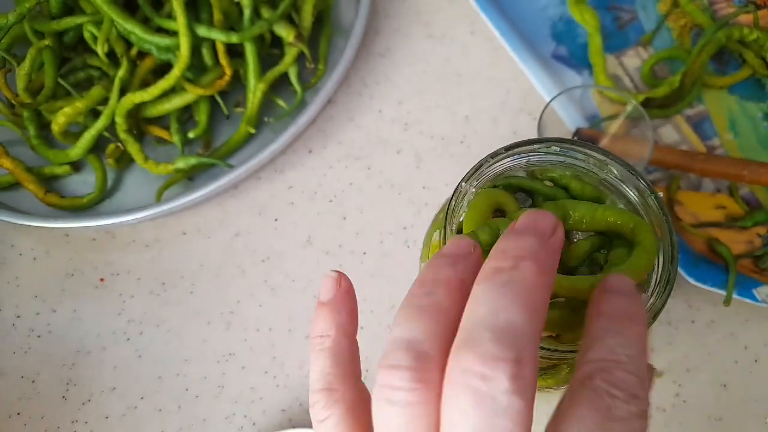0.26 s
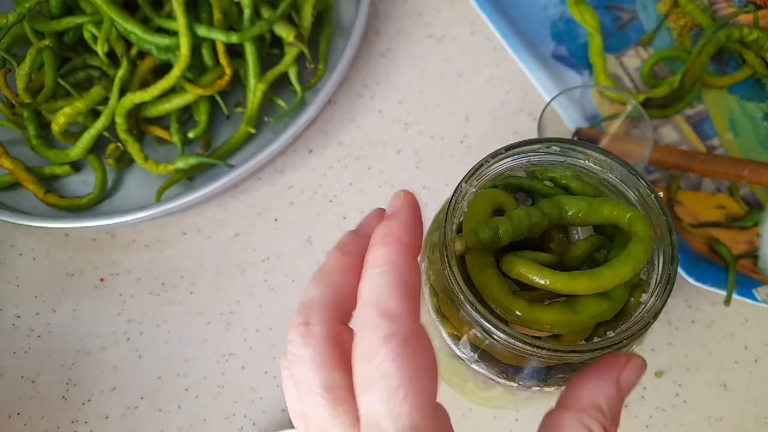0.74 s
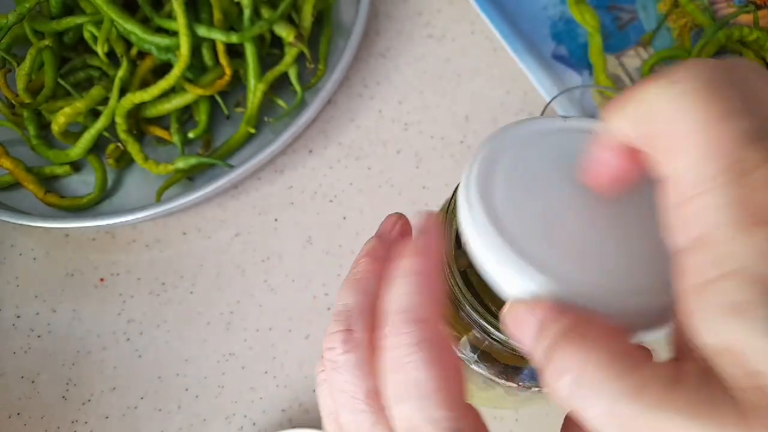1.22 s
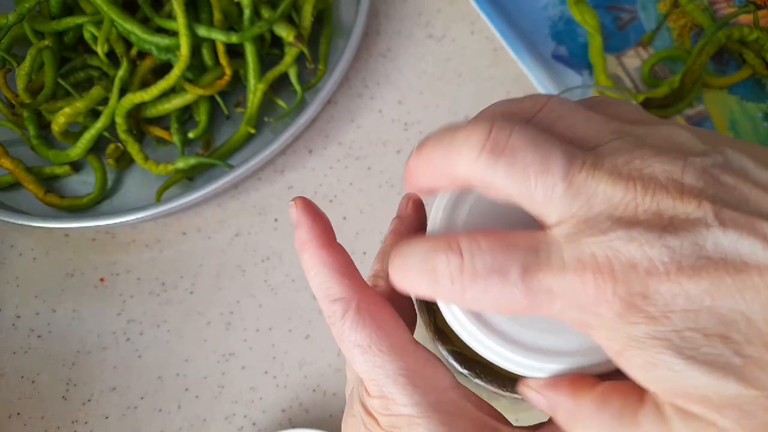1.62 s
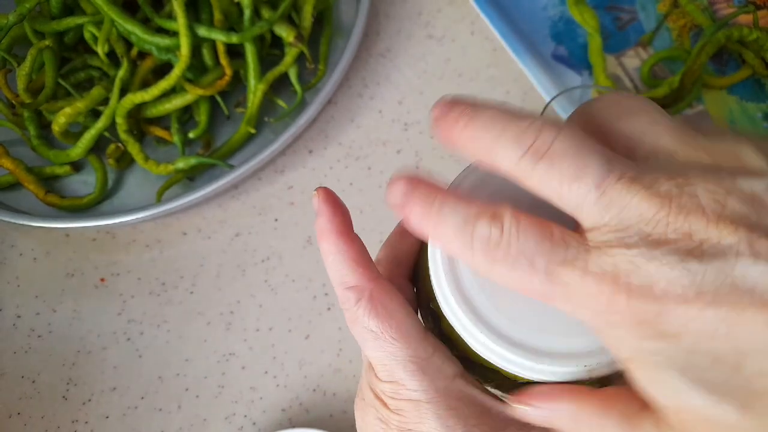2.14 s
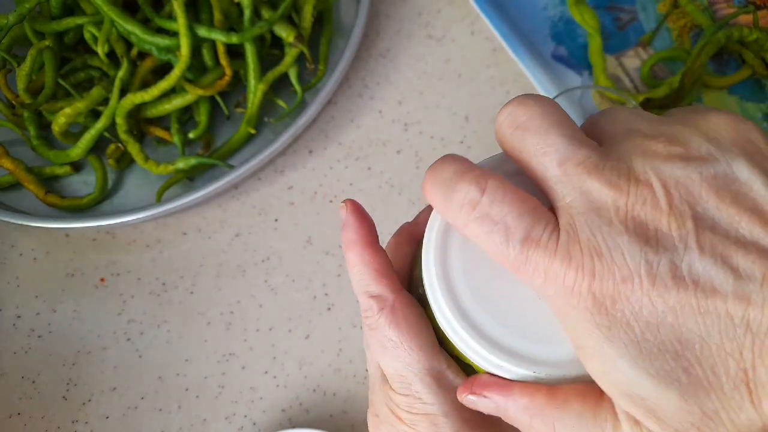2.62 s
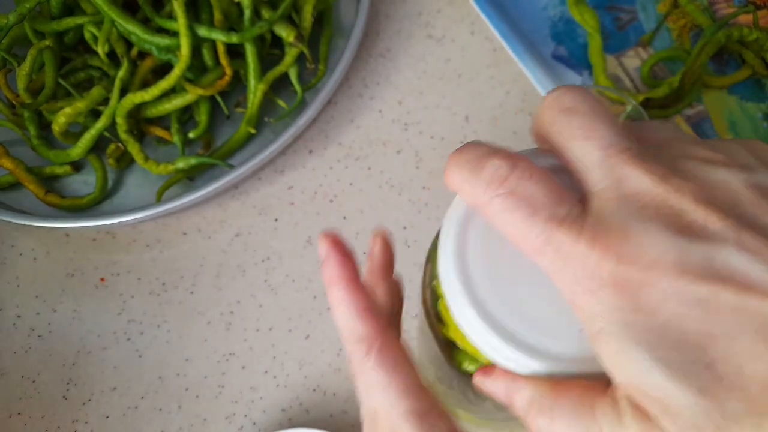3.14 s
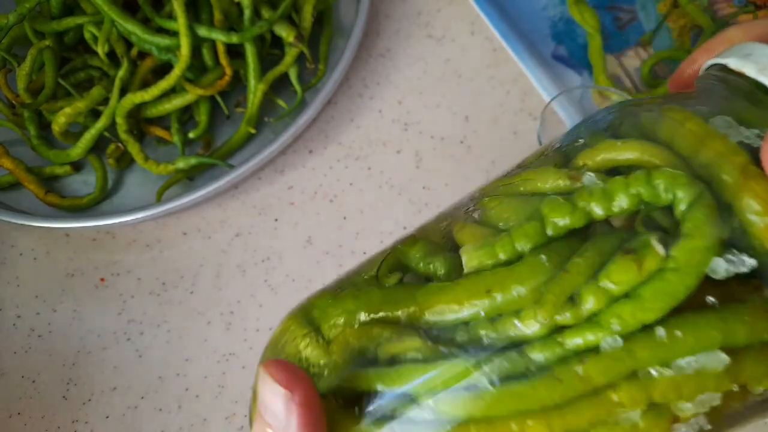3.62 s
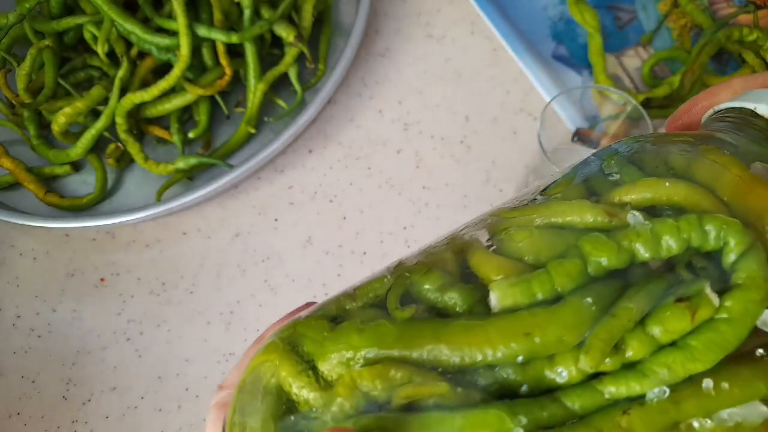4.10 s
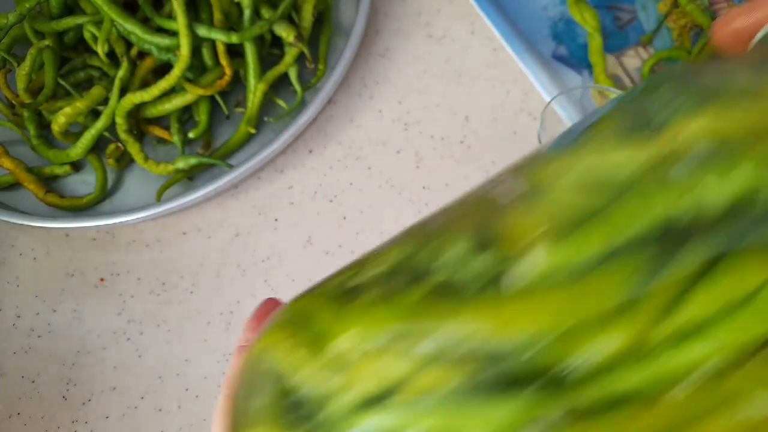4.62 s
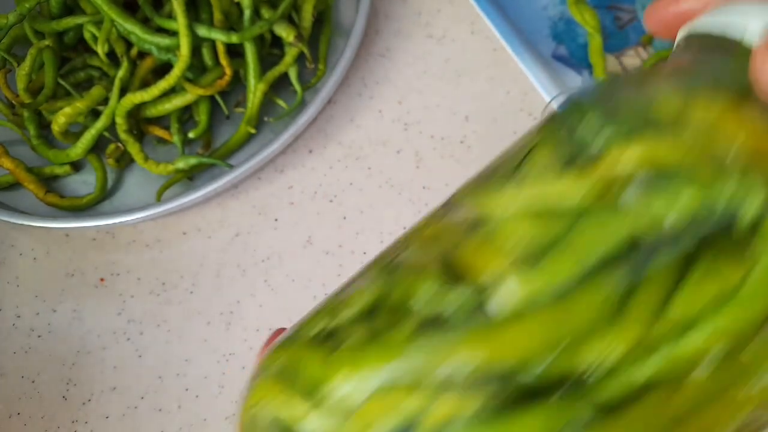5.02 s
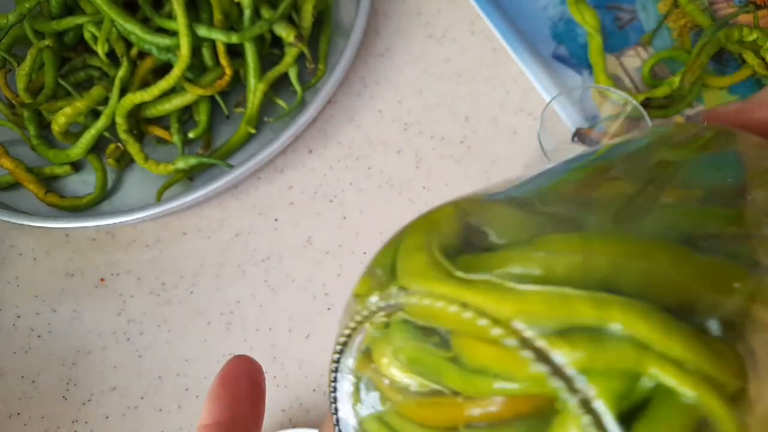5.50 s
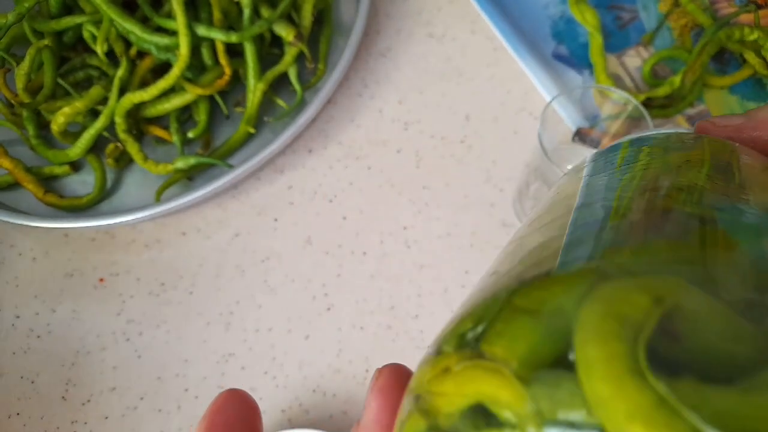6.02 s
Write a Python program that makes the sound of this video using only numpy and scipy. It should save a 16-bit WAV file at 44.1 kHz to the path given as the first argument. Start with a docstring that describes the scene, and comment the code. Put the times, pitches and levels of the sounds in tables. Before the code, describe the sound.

Close kitchen sounds: a lid rattles sharply onto a jar, muffled clicks and thread scrapes tighten it, then quiet skin rubs and tiny wet clicks follow.

```python
"""On a kitchen counter a metal screw lid is set on a full glass jar, rattles onto the thread and is twisted shut.
Knocks ring the lid's modes; turns scrape the thread and push the counter. The jar is then tipped in wet hands:
bands of noise rub on the glass and short clicks tick. A fridge hums as blurred tones over a low rumble,
a faint narrow hiss and room air."""
import sys
import numpy as np
from scipy import signal
from scipy.fft import rfft, irfft
from scipy.io import wavfile
from scipy.ndimage import uniform_filter1d

SR = 44100
rng = np.random.default_rng(int(sys.argv[2]) if len(sys.argv) > 2 else 0)


def store_wav(level_fs):
    """Save 16-bit WAV to argv[1]."""
    pcm = np.round(np.clip(np.atleast_2d(level_fs), -1, 1) * 32767)
    wavfile.write(sys.argv[1], SR, pcm.T.astype(np.int16))


N = 276066  # length in samples

# lid against rim: start_s, peak_db, treble_over_ring_db, counter_thud_db, favoured_pitch_hz
LID_KNOCKS = [(1.185, -14.5, -22, -25.5, 1900), (1.296, -29.5, -0.5, -45, 2610),
              (1.324, -14, -13, -26, 1360), (1.344, -24, -13, -58, 1880), (1.373, -17, -7, -15, 1280),
              (1.48, -27.5, -12, -38, 1490), (1.5, -27, -19, -46, 1290), (1.76, -48, -10, -41, 1310),
              (1.805, -46, -24, -30.5, 2450), (1.819, -40, -29, -46, 2420), (1.884, -27, -19.5, -48, 1260),
              (1.896, -23, -12, -24.5, 1660), (1.941, -27, -2, -44, 2950), (1.961, -29, -2, -23, 2940),
              (2.034, -50, 5, -60, 3620), (2.045, -46, 5.5, -52, 3440), (2.201, -48.5, 5, -37, 1840),
              (2.243, -53, -1.5, -33.5, 1330), (2.308, -36.5, -12.5, -48, 1250),
              (2.337, -42, -8, -35.5, 3620), (2.409, -45, -25, -37, 3470), (2.554, -58.5, -1, -63, 3460),
              (2.721, -41, -7.5, -44, 2220), (2.758, -49, -12, -44, 2230), (2.779, -49.5, -12, -34.5, 2070),
              (2.883, -38.5, -6.5, -35, 3270), (2.918, -38.5, -7.5, -63, 3660), (2.97, -40, -3, -43, 3660),
              (3.007, -47.5, -2, -40, 3480)]
# ringing modes of the lid: pitch_hz, level_db, t60_s (before damping)
LID_MODES = [(1000, -5, .05), (1190, -9, .04), (1355, -.4, .07), (1630, -10, .05), (1880, -9, .06),
             (2150, -10, .04), (2525, -4, .05), (2620, -4, .075), (2950, -10, .04), (3380, -2, .07),
             (3600, -8, .06), (4290, -13, .05), (5300, -14, .04), (6300, -22, .03), (7500, -22, .03)]
# ringing modes of the counter: pitch_hz, level_db, t60_s (before damping)
COUNTER_MODES = [(216, -13, 0.015), (247.5, 5.5, 0.056), (293, -0.5, 0.06), (366, -1.5, 0.057),
                 (485, -16.5, 0.081)]
# turns of the wrist: start_s, length_s, thread_scrape_db, counter_push_db, deepest_counter_mode_db
WRIST_TURNS = [(1.165, 0.11, -56, -47.5, -79), (1.289, 0.13, -53.5, -35, -52),
               (1.438, 0.11, -54, -36, -32.5), (1.587, 0.14, -69.5, -53, -45.5),
               (1.762, 0.081, -56.5, -42, -67), (1.832, 0.13, -45, -36.5, -40.5),
               (2.022, 0.053, -72, -49.5, -54.5), (2.272, 0.11, -62.5, -52, -59),
               (2.369, 0.099, -63.5, -45.5, -52.5), (2.511, 0.19, -73.5, -55.5, -71),
               (2.687, 0.12, -71, -49, -50.5), (2.856, 0.2, -66, -54, -56), (3.09, 0.13, -69, -53.5, -66)]
# fingers sliding on lid and glass: start_s, length_s, lower_band_db, upper_over_lower_db
SKIN_RUBS = [(0.355, 0.24, -76, 3.5), (0.565, 0.16, -85, 7.5), (0.717, 0.094, -81, 6),
             (0.843, 0.09, -86.5, 14.5), (3.066, 0.24, -74.5, -16), (3.468, 0.13, -82.5, 1.5),
             (3.559, 0.15, -72, -6), (3.721, 0.088, -66, -2.5), (3.81, 0.065, -79, -2.5),
             (3.886, 0.15, -60.5, -4), (4.132, 0.031, -85, 10), (4.454, 2.03, -88.5, 4.5),
             (4.631, 0.092, -75.5, 1), (4.752, 0.1, -67.5, 0.5), (4.835, 0.15, -77.5, 5),
             (5.048, 0.11, -66, -1), (5.141, 0.14, -66, 1), (5.39, .25, -79.5, 17), (5.756, 0.14, -73, -1),
             (6.057, 0.25, -86, 3.5)]
# wet skin letting go of the glass: start_s, lower_band_peak_db, centre_hz
SKIN_TICKS = [(3.562, -57.5, 3270), (3.575, -53.5, 4910), (3.7361, -46, 4330), (3.7738, -44.5, 2720),
              (3.8367, -57.5, 4340), (3.902, -54.5, 7860), (3.914, -48.5, 8000), (3.932, -58, 6500),
              (3.9507, -44, 5500), (4.128, -56.5, 7000), (4.6435, -59.5, 3560), (4.7474, -57, 6930),
              (4.8792, -49, 5260), (5.0668, -51, 8000), (5.104, -49, 6400), (5.1598, -48.5, 5800),
              (5.463, -49, 10000), (5.5072, -46.5, 5650), (5.5613, -51.5, 7750), (5.7159, -56, 7500),
              (5.7548, -54, 5430), (5.8237, -45.5, 6000)]
# jar nudged on the counter: start_s, peak_db, pitch_hz, t60_s, rattle_peak_db
JAR_BUMPS = [(0.592, -40, 117, 0.15, -81), (3.926, -46, 192, 0.079, -49),
             (3.938, -25.5, 526, 0.0075, -41.5), (3.952, -37, 477, 0.061, -40),
             (3.978, -44, 640, 0.019, -33.5), (3.987, -39.5, 184, 0.015, -45)]
# a faint glass clink: pitch_hz, level_db, t60_s (before damping)
CLINK_MODES = [(2640, -6.5, 0.055), (4670, -6, 0.21), (12200, -1, 0.15)]
# fridge tones: pitch_hz, level_db, blur_width_hz (of each filter pass)
FRIDGE_TONES = [(140.7, -71.5, 9), (184.8, -64, 6.9), (199.3, -63, 3), (240.4, -68.5, 9),
                (325.6, -71.5, 14), (376.6, -62.5, 1.7), (423.3, -67, 3.8), (532, -83.5, 8.6),
                (969, -75, 3.4), (1065, -85.5, 3.6)]
# a low rumble, strongest at first: time_s, level_db
RUMBLE_LEVEL = [(0, -64.5), (.95, -68), (1.099, -83), (3.099, -75.5), (6.26, -82)]
# tilt of the room air, before its overall level is set: pitch_hz, relative_db
AIR_SPECTRUM = [(15, -52), (25, -21), (92, -20.5), (180, 1.5), (285, -10.5), (373, -3), (591, -21.5),
                (863, -21), (962, -24), (1190, -34.5), (6740, -41.5), (7310, -50.5), (9570, -37.5),
                (14800, -39), (16000, -56)]
# how alike the air is at both ports: pitch_hz, likeness (0 to 1)
AIR_LIKENESS = [(60, 0.17), (180, 0.56), (550, 0.8), (1650, 0.21), (4970, 0.015), (15000, 0.079)]
# stereo balance of the background: pitch_hz, left_over_right_db
AIR_BALANCE = [(60, -3.5), (380, -2.5), (2380, -6.5), (15000, 2)]
# stereo balance of the jar: pitch_hz, left_over_right_db
JAR_BALANCE = [(60, -1), (240, -1), (950, -5), (3770, -0.5), (15000, 1.5)]

# Lid contacts
SEATED_S = 1.45  # from here on the lid sits on the thread
CLEAN_BLOW = 4.  # single impulse put ahead of the chatter of a free lid
NARROW_FREE_DB, NARROW_SEATED_DB = 2.5, 22  # fall per octave away from the favoured pitch
SCATTER_DB = 2.5  # every contact lands elsewhere and spreads the mode levels
DETUNE_FREE, DETUNE_SEATED = .004, .04  # pressure bends the modes, as a share of their pitch

# Twisting
TURN_RISE_S = 0.035
TURN_FADE_S = (0.02, 0.029, .06)  # decay constants of scrape, push and deepest mode
SCRAPE_GRIP = 8.  # damping of the turning lid
SCRAPE_HZ, TIGHTEN_S = (1900, 3300), (2.0, 2.4)  # favoured pitch loose and tight; when the thread tightens
DEEP_MODE, DEEP_PURITY = (123.5, 13), 1.5  # (Hz, width Hz); sine peak against noise rms
SHUDDER_BAND, SHUDDER_DB = (62.5, 30), -20  # cabinet under the counter (Hz, width Hz); level against the push

# Hands and glass
LID_ON_S, TIPPED_S = 1.18, 4.05  # the lid meets the jar; the jar lies tipped in the hands
ON_LOOSE_LID, ON_SHUT_LID, ON_GLASS = (3390, 330), (3900, 5100), (5270, 3100)  # lower skin band (Hz, width Hz)
SKIN_BAND, SKIN_AIR = (10200, 4200), .55  # upper skin band (Hz, width Hz); gain of the fizz above it
TICK_TREBLE_DB = 1
STRAY_PER_S, STRAY_SPAN_S = 16, (5.3, 6.25)  # faint ticks at random while the jar is turned
STRAY_DB, STRAY_HZ = -68, (4000, 8000)  # faintest stray tick; range of centres
CLINK_S, CLINK_DB = .152, -62

# Background
HUM_PURITY = 2.2  # sine peak against noise rms
WHINE_SPAN_S, WHINE_BAND, WHINE_DB = (4.55, 5.95), (1470, 260), -84  # band: (Hz, width Hz)
AIR_DB, AIR_PATCHY_DB = -58.5, 1.6  # overall level; rms unevenness over time and pitch

# Space
AIR_LEAD_S, JAR_LEAD_S, HAND_LEAD_S = -0.00011, .00006, .00003  # left port ahead of the right
JAR_LOW_HZ = 105  # jar sounds fall away below this
ROOM_DB = -12
GLINT_DB, GLINT_HZ, GLINT_T60_S = -2.5, 4500, .02  # glass and hands scatter the treble
GLINT_CYCLES_PER_S = 3.7  # pace at which the echo patterns take turns
TOP_HZ = 15700


def knocks():
    """Each contact is a short chatter: it rings the lid, cracks in the treble and thuds through the jar."""
    out = np.zeros(N)
    t = np.arange(1500) / SR
    thud = np.convolve(ring(COUNTER_MODES, 2.1), np.hanning(130))  # the heavy jar takes the blow softly
    for s, db, crack_db, thud_db, hz in LID_KNOCKS:
        # a free lid is struck cleanly and a weak part of it sings on; on the thread it chatters and is dull
        free = s < SEATED_S
        chatter_s, sing_db, grip = (.0006, -17, 2.8) if free else (.0015, -36, 6.)
        narrow_db = NARROW_FREE_DB if free else NARROW_SEATED_DB  # a clean blow reaches more modes
        u = t / chatter_s
        chatter = rng.standard_normal(1500) * u * np.exp(-u)
        chatter[0] += CLEAN_BLOW * free

        bend, share = rng.standard_normal((2, len(LID_MODES)))
        bend = 1 + (DETUNE_FREE if free else DETUNE_SEATED) * bend
        modes = [(f * b, level + SCATTER_DB * c, t60)
                 for (f, level, t60), b, c in zip(LID_MODES, bend, share)]
        gripped = ring(modes, grip, hz, narrow_db)
        singing = ring(modes, 0.38, hz, narrow_db)
        lid = gripped + gain_of(sing_db) * singing
        lid = treble(signal.fftconvolve(lid, chatter), 720)

        crack_shape = (1 - np.exp(-t / 0.0009)) * (np.exp(-t / 0.0004) + 0.11 * np.exp(-t / 0.0072))
        crack = sizzle(rng.standard_normal(1500) * crack_shape)
        add(out, s, gain_of(db) * peaked(lid))
        add(out, s, gain_of(db + crack_db) * peaked(crack))
        add(out, s + .003, gain_of(thud_db) * peaked(thud))
    return out


def twist():
    """Slips of the thread ring the gripped lid; the turning force shakes the counter."""
    scrape_gain, push_gain, deep_gain = map(effort, np.transpose(WRIST_TURNS)[2:], TURN_FADE_S)
    slips = grit(2500, 3.2)
    loose, tight = (scraped_lid(slips, hz) for hz in SCRAPE_HZ)
    tightness = np.interp(np.arange(N) / SR, TIGHTEN_S, (0, 1))
    scrape = (1 - tightness) * loose + tightness * tight
    hiss = evened(sizzle(slips + 1.5 * rng.standard_normal(N)))

    shove = rng.standard_normal(N) + .7 * grit(150, 2.5)
    push = evened(signal.oaconvolve(shove, ring(COUNTER_MODES))[:N])
    deep = evened(band(shove, *DEEP_MODE))
    tone = np.sin(2 * np.pi * DEEP_MODE[0] * np.arange(N) / SR)
    deep = evened(deep + DEEP_PURITY * tone)
    return scrape_gain * (scrape + gain_of(-9.0) * hiss) + push_gain * push + deep_gain * deep


def scraped_lid(slips, hz):
    """Thread slips ring the heavily damped lid, strongest near hz."""
    lid = ring(LID_MODES, SCRAPE_GRIP, hz, 4.5)
    return evened(treble(signal.oaconvolve(slips, lid)[:N], 490))


def effort(levels_db, fade_s):
    """Gain of one layer over all turns: each rises, holds and dies away; overlapping turns add in power."""
    t = np.arange(N) / SR
    power = np.zeros(N)
    for (s, length, *_), db in zip(WRIST_TURNS, levels_db):
        rise = np.clip((t - s) / TURN_RISE_S, 0, 1) ** 2
        fade = np.exp(-np.maximum(t - s - length, 0) / fade_s)
        power += (gain_of(db) * rise * fade) ** 2
    return np.sqrt(power)


def rubs():
    """Skin ridges hiss on lid and glass in a lower band and a high, fixed one; each stroke swells unevenly."""
    out = np.zeros(N)
    for s, length, db, upper_db in SKIN_RUBS:
        hz, width = ON_LOOSE_LID if s < LID_ON_S else ON_SHUT_LID if s < TIPPED_S else ON_GLASS
        n = round(length * SR)
        noise = rng.standard_normal(n)
        swell_db = 2.1 * evened(uniform_filter1d(rng.standard_normal(n), 150))
        fizz = noise * gain_of(swell_db)
        lower = evened(band(fizz, hz, width))
        upper = evened(band(fizz, *SKIN_BAND) + SKIN_AIR * treble(fizz, SKIN_BAND[0]))
        stroke = signal.windows.tukey(n, .7)
        add(out, s, gain_of(db) * stroke * (lower + gain_of(upper_db) * upper))
    return out


def ticks():
    """Wet skin lets go in short two-band clicks with a puff of noise behind; fainter ones fall at random."""
    out = np.zeros(N)
    t = np.arange(1200) / SR
    count = round(STRAY_PER_S * np.ptp(STRAY_SPAN_S))
    when, size, pitch = rng.random((count, 3)).T
    stray_s = np.interp(when, (0, 1), STRAY_SPAN_S)
    stray_hz = np.interp(pitch, (0, 1), STRAY_HZ)
    strays = zip(stray_s, STRAY_DB + 8 * size, stray_hz)
    shape = (1 - np.exp(-t / 0.000069)) * (np.exp(-t / 0.0007) + 0.02 * np.exp(-t / 0.048))
    for s, db, hz in [*SKIN_TICKS, *strays]:
        puff = rng.standard_normal(1200) * shape
        lower = peaked(band(puff, hz, 3100))
        upper = peaked(resonate(puff, 7500, 2900))
        add(out, s, gain_of(db) * (lower + gain_of(TICK_TREBLE_DB) * upper))
    return out


def bumps():
    """The nudged jar: dull knocks with a soft start and a short rattle of glass, and the clink."""
    out = np.zeros(N)
    t = np.arange(SR // 3) / SR
    for s, db, hz, t60, rattle_db in JAR_BUMPS:
        soft_start = 1 - np.exp(-(t * hz) ** 2)
        knock = gain_of(-60 * t / t60) * soft_start * np.sin(2 * np.pi * hz * t)
        add(out, s, gain_of(db) * peaked(knock))
        rattle = resonate(resonate(rng.standard_normal(len(t)), 790, 1730), 760, 1560)
        rattle = rattle * t * np.exp(-t / 0.0032)
        add(out, s, gain_of(rattle_db) * peaked(rattle))
    add(out, CLINK_S, gain_of(CLINK_DB) * ring(CLINK_MODES))
    return out


def shudder():
    """The push of each turn also shakes the cabinet: low noise that follows the push."""
    low = band(rng.standard_normal(N), *SHUDDER_BAND)
    push_gain = effort(np.transpose(WRIST_TURNS)[3], TURN_FADE_S[1])
    return gain_of(SHUDDER_DB) * push_gain * evened(low)


def hum():
    """Fridge tones: steady sines, each blurred by a narrow noise band."""
    t = np.arange(N) / SR
    out = np.zeros(N)
    for hz, db, width in FRIDGE_TONES:
        tone = np.sin(2 * np.pi * (hz * t + rng.random()))
        blur = evened(band(rng.standard_normal(N), hz, width))
        out += gain_of(db) * evened(HUM_PURITY * tone + blur)
    return out


def rumble():
    """Narrow noise near the bottom of the range, its level drawn over time."""
    s, db = np.transpose(RUMBLE_LEVEL)
    low = band(rng.standard_normal(N), 59, 10)
    return gain_of(np.interp(np.arange(N) / SR, s, db)) * evened(low)


def whine():
    """A faint narrow band of hiss that fades in and out."""
    out = np.zeros(N)
    n = round(np.ptp(WHINE_SPAN_S) * SR)
    hiss = band(rng.standard_normal(n), *WHINE_BAND)
    add(out, WHINE_SPAN_S[0], gain_of(WHINE_DB) * signal.windows.tukey(n, .4) * evened(hiss))
    return out


def air():
    """Room air and microphone hiss: random short-time spectra, partly shared by both ports."""
    frames, hz = N // 256 + 5, np.fft.rfftfreq(1024, 1 / SR)
    a, b, c, d, patches = rng.standard_normal((frames, 513, 5)).T
    patches = evened(uniform_filter1d(uniform_filter1d(patches, 12, 0), 14, 1))
    same = np.clip(read(AIR_LIKENESS, hz), -1, 1)[:, None]
    delay = np.exp(-2j * np.pi * hz * AIR_LEAD_S)[:, None]
    left = a + 1j * b
    right = same * left * delay + np.sqrt(1 - same ** 2) * (c + 1j * d)
    half = gain_of(read(AIR_BALANCE, hz) / 2)[:, None]  # half the balance on each side
    colour = gain_of(read(AIR_SPECTRUM, hz)[:, None] + AIR_PATCHY_DB * patches)
    spectra = np.array([left * half, right / half]) * colour
    hiss = signal.istft(spectra, nperseg=1024, noverlap=768)[1][:, :N]
    return gain_of(AIR_DB) * evened(hiss)


def kitchen(x, t60):
    """Sparse dying echoes of random sign, other ones for each port."""
    taps = np.zeros((2, SR // 2))
    jitter = rng.integers(0, 20, (2, (SR // 2 - 81) // 20))
    at = np.arange(80, SR // 2 - 20, 20) + jitter
    np.put_along_axis(taps, at, rng.choice([-1., 1.], at.shape), 1)
    taps = treble(taps, 360) * gain_of(-60 * np.arange(SR // 2) / SR / t60)
    return signal.fftconvolve(x[None], taps / np.linalg.norm(taps[0]), axes=1)[:, :N]


def glint(x):
    """Close treble reflections: three echo patterns fade in and out in turn."""
    turn = np.pi * GLINT_CYCLES_PER_S * np.arange(N) / SR
    bright = treble(x, GLINT_HZ)
    echoes = sum(kitchen(bright * np.cos(turn + k * np.pi / 3) ** 2, GLINT_T60_S) for k in range(3))
    return gain_of(GLINT_DB) * echoes


def ports(x, lead_s, balance):
    """The two microphone ports hear one source with a time and level offset."""
    hz = np.fft.rfftfreq(N, 1 / SR)
    half = gain_of(read(balance, hz) / 2) * np.exp(1j * np.pi * hz * lead_s)
    return irfft(rfft(x) * np.array([half, 1 / half]), N)


def ring(modes, damping=0.89, centre_hz=0, narrow_db=0):
    """Dying sines after one blow, peak 1; modes near centre_hz are favoured by where the blow lands."""
    t = np.arange(SR // 4) / SR
    hz, db, t60 = np.transpose(modes)[:, :, None]
    db = db - narrow_db * abs(np.log2(hz / (centre_hz or hz)))  # no centre: no favour
    sines = gain_of(db - 60 * t * damping / t60) * np.sin(2 * np.pi * hz * t)
    return peaked(sines.sum(0))


def grit(per_s, spread_db):
    """Random slips of uneven size."""
    size = rng.standard_normal(N) * gain_of(spread_db * np.minimum(rng.exponential(1, N), 4))
    return evened(size * (rng.random(N) < per_s / SR))


def sizzle(x):
    """The treble of metal contacts: a broad band and a peak above it."""
    return treble(resonate(x, 5300, 7000) + 2.5 * band(x, 10200, 4500), 5000)


def resonate(x, hz, width):
    """Resonance of gain 1: shifts the pitch hz down to zero, smooths, and shifts back."""
    turn = np.exp(2j * np.pi * np.cumsum(hz * np.ones(len(x))) / SR)
    r = np.exp(-np.pi * width / SR)
    return 2 * (turn * signal.lfilter([1 - r], [1, -r], x / turn)).real


def band(x, hz, width):
    """The same resonance twice over, for steeper skirts."""
    return resonate(resonate(x, hz, width), hz, width)


def treble(x, hz):
    """Third-order high-pass."""
    return signal.sosfilt(signal.butter(3, hz, "high", fs=SR, output="sos"), x)


def gain_of(db):
    """Decibels to gain."""
    return 10 ** (np.asarray(db) / 20)


def evened(x):
    """Scales to rms 1."""
    return x / np.sqrt(np.mean(x ** 2) + 1e-20)


def peaked(x):
    """Scales to peak 1."""
    return x / abs(x).max()


def read(points, hz):
    """Reads a spectrum table on a log-frequency axis."""
    f, value = np.transpose(points)
    return np.interp(np.log(hz + 1), np.log(f + 1), value)


def add(mix, s, sound):
    """Mixes a sound in at time s, cut at the end of the mix."""
    part = mix[..., round(s * SR):][..., :sound.shape[-1]]
    part += sound[..., :part.shape[-1]]


def scene():
    """Jar and hands close below the microphone, fridge and air around."""
    jar = treble(knocks() + twist() + bumps(), JAR_LOW_HZ)
    hands = rubs() + ticks()
    hand_balance = [(3000, -0.5), (12000, -12)]  # pitch_hz, left_over_right_db
    near = ports(jar, JAR_LEAD_S, JAR_BALANCE) + ports(hands, HAND_LEAD_S, hand_balance)
    close = jar + hands
    early = gain_of(-9) * kitchen(close, 0.096)  # counter top, dishes and hands throw back at once
    early += glint(close)
    room = gain_of(ROOM_DB) * kitchen(close, 0.42)
    background = ports(hum() + rumble() + shudder() + whine(), AIR_LEAD_S, AIR_BALANCE)
    return near + early + room + background + air()


def record(dry):
    """The band limit of the recorder: a steep low-pass."""
    low_pass = signal.firwin(511, TOP_HZ, window=("kaiser", 9), fs=SR)
    return signal.oaconvolve(dry, low_pass[None], "same")


dry = scene()
out = record(dry)
store_wav(out)
```